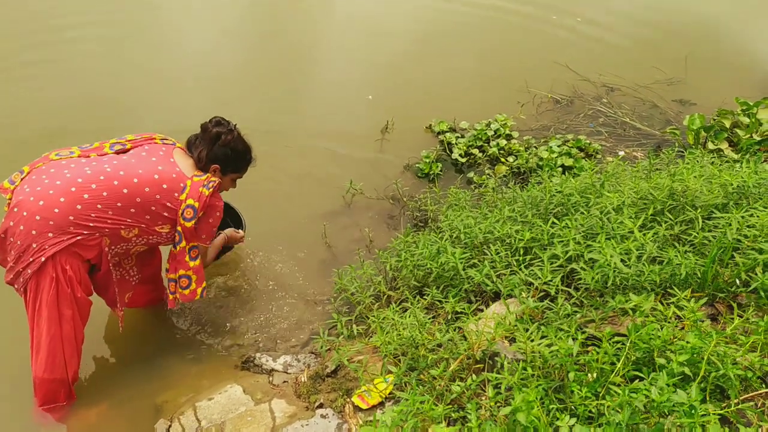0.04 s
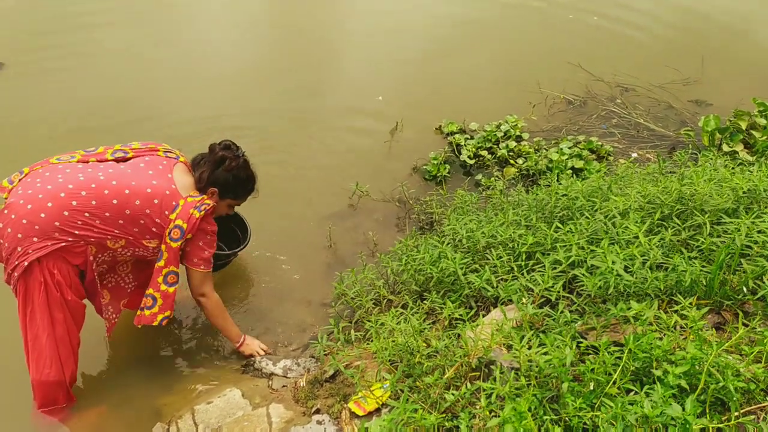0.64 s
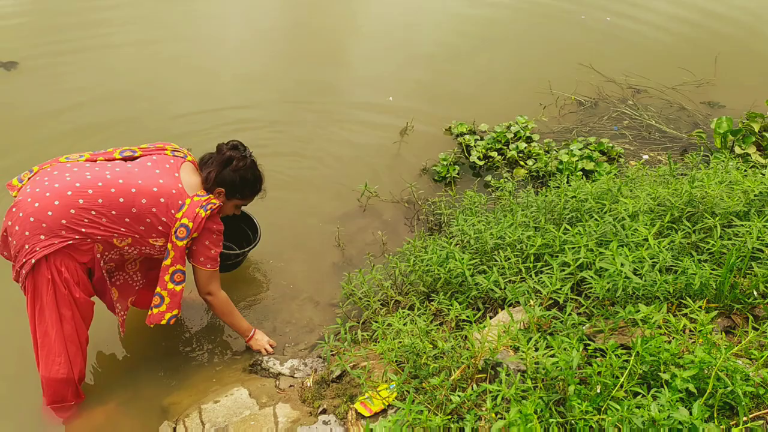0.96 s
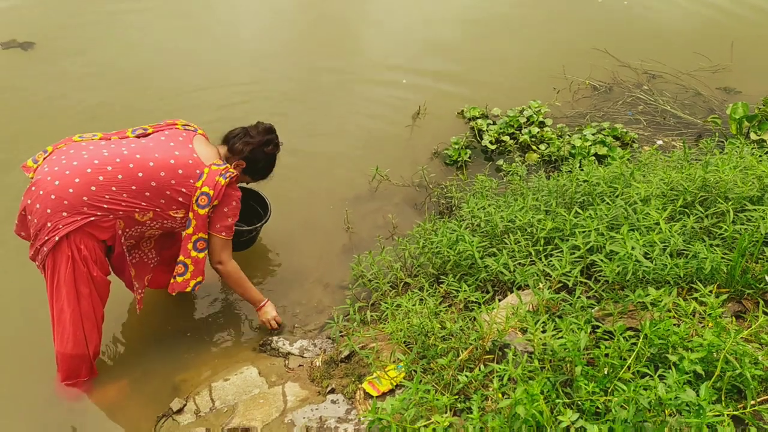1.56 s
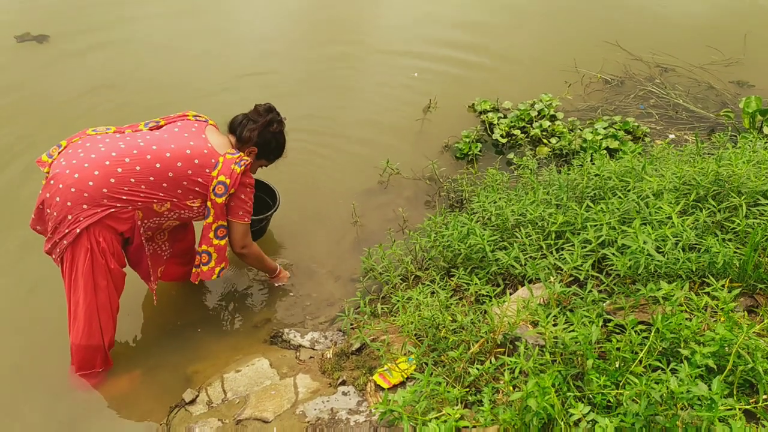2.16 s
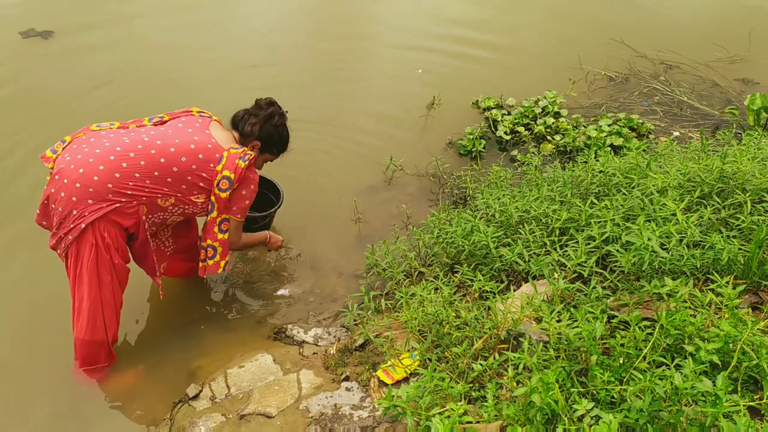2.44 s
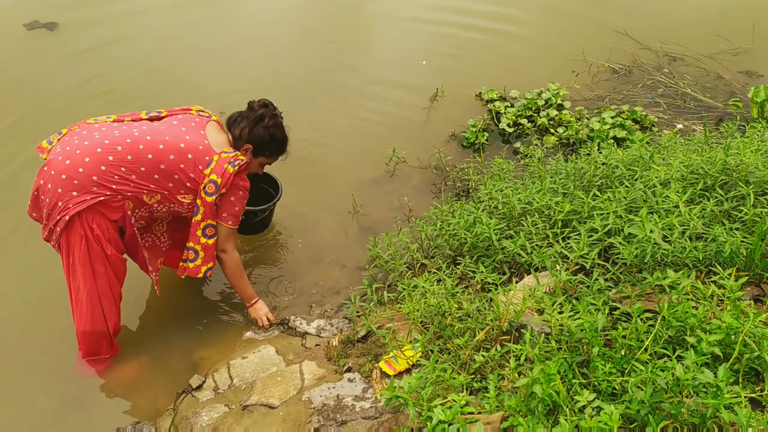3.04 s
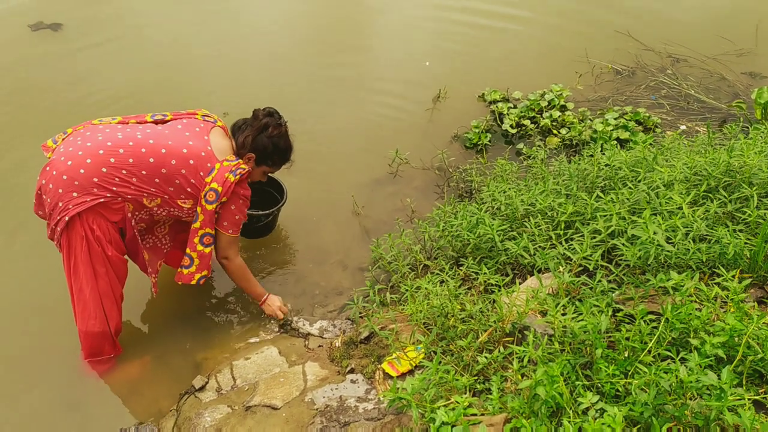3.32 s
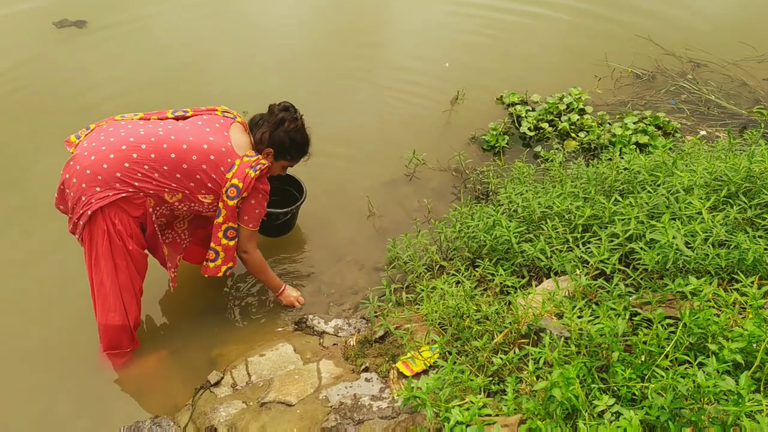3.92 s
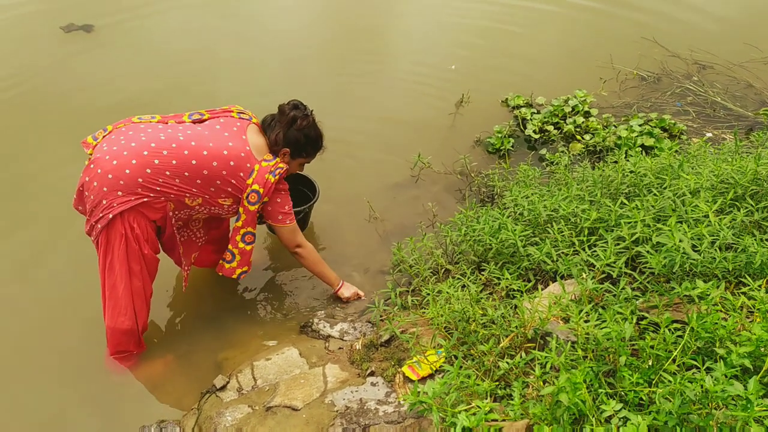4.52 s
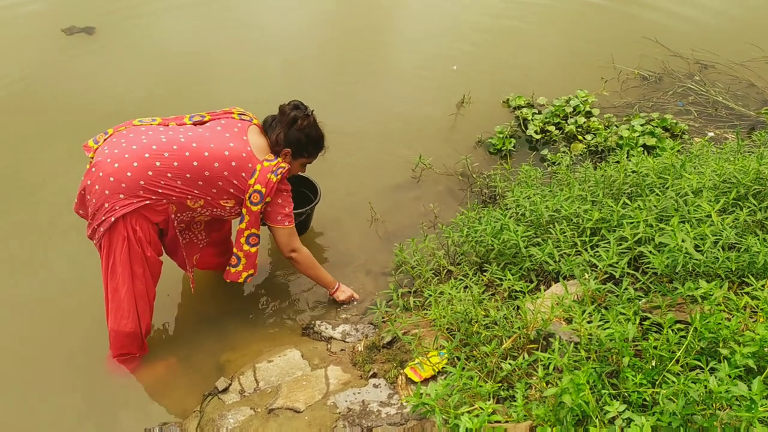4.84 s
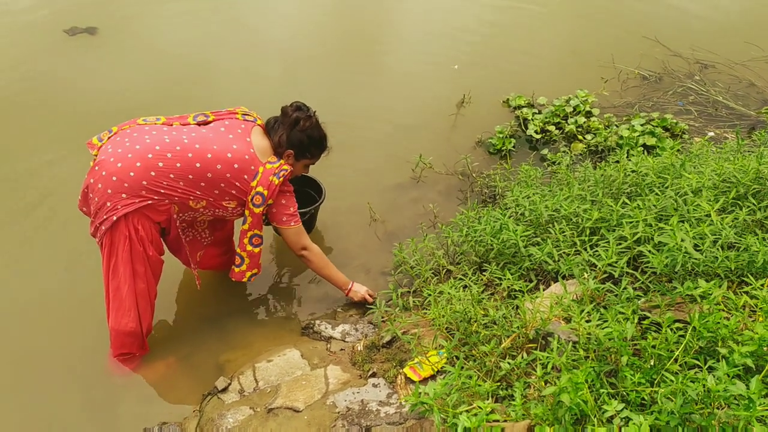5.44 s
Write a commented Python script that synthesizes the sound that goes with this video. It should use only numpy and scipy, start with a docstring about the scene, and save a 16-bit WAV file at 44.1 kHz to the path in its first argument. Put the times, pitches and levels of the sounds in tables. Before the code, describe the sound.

At a river's edge, wind buffets the microphone while a hand swishes through shallow water. Small hard objects clatter into a plastic bucket, bouncing and rolling briefly. A few drips and a soft trickle follow, then a second clatter in the bucket. The water and bucket are close and dry; behind them are a soft open-air hiss, a faint distant engine, an insect's trill and a chirping bird.

```python
"""Two clattering drops into a plastic bucket, amid swishes and drips at a river's edge.
Small hard finds strike the bucket's floor and wall, bounce, roll and ring its air. A wader's hand
stirs the shallows into bubbles and spray; water drips and trickles off it. Wind buffets the
microphone, mostly at first. Behind: open-air hiss, a slow far engine, an insect's trill, a bird."""
import sys
import numpy as np
from scipy import signal
from scipy.fft import rfft, irfft
from scipy.io import wavfile

SR = 44100
rng = np.random.default_rng(int(sys.argv[2]) if len(sys.argv) > 2 else 0)


def master(y):
    """Save y as 16-bit WAV."""
    cut = np.clip(np.atleast_2d(y).T, -1, 1)
    pcm = np.round(cut * 32767)  # scale
    wavfile.write(sys.argv[1], SR, pcm.astype(np.int16))


N = 246078

# Likeness of the two microphone ports, general and near: (frequency [Hz], coherence [clipped to 0-1])
COHERENCE = [(60, 0.89), (250, 1), (600, 0.48), (1500, 0.044), (3000, 0.008), (12000, 0.014)]
NEAR_COHERENCE = [(1900, 0.5), (3600, -1), (8000, 0.03)]
# Bucket wall modes: (frequency [Hz], relative level [dB], t60 [s])
WALL_MODES = [(720, -27, 0.019), (847, -9, 0.04), (1237, -6.5, 0.023), (1584, -6.5, 0.04),
              (1686, -5.5, 0.013), (1775, -6, 0.02), (1965, -2.5, 0.021), (2156, -9.5, 0.046),
              (2498, -7, 0.024), (3004, -12.5, 0.04), (3596, 0.5, 0.024), (4010, -11, 0.023),
              (4930, -5, 0.011)]


def gain_of(db):
    """Decibels to amplitude."""
    return 10 ** (np.asarray(db) / 20)


def unit_rms(x):
    """Scale to rms 1."""
    return x / np.sqrt(np.mean(x ** 2) + 1e-20)


def unit_peak(x):
    """Scale so the channel mean peaks at 1."""
    return x / abs(x.mean(0)).max()


def unit_onset(x, size=256):
    """Scale to rms 1 over the first samples."""
    return x / np.sqrt(np.mean(x[:, :size] ** 2))


def log_interp(points, hz):
    """Interpolate on a log-frequency axis."""
    point_hz, value = np.transpose(points)
    return np.interp(np.log(hz + 1), np.log(point_hz + 1), value)


def add(mix, start_s, sound):
    """Mix a sound in at start_s."""
    part = mix[:, max(round(start_s * SR), 0):][:, :sound.shape[-1]]
    part += sound[..., :part.shape[1]]


def colour(x, points, size=4096):
    """Minimum-phase filter through points (frequency [Hz], gain [dB])."""
    hz = abs(np.fft.fftfreq(size, 1 / SR))
    log_gain = np.log(gain_of(np.maximum(log_interp(points, hz), -100)))
    taps = np.fft.ifft(np.exp(np.conj(signal.hilbert(log_gain)))).real[:size // 2]
    return signal.oaconvolve(x, taps[None], axes=1)[:, :x.shape[1]]


def convolve(x, response):
    """Convolve along time, cut to N samples."""
    return signal.fftconvolve(np.atleast_2d(x), np.atleast_2d(response), axes=1)[:, :N]


def wander(rate_hz, size=N):
    """Smooth random drift, rms 1."""
    hz = np.fft.rfftfreq(size, 1 / SR)
    return unit_rms(irfft(rfft(rng.standard_normal(size)) / (1 + (hz / rate_hz) ** 4), size))


def stereo_noise(size=N, coherence=COHERENCE):
    """White noise, partly alike at two close ports."""
    alike = np.clip(log_interp(coherence, np.fft.rfftfreq(size, 1 / SR)), 0, 1)
    left, other = rfft(rng.standard_normal((2, size)))
    right = alike * left + np.sqrt(1 - alike ** 2) * other
    return irfft(np.array([left, right]), size)


def noise_band(phase, spread_hz):
    """Narrow noise around a carrier, independent per port."""
    size = len(phase)
    return np.array([wander(spread_hz, size) * np.cos(phase) + wander(spread_hz, size) * np.sin(phase)
                     for port in range(2)])


def burst(t, t60_s, coherence=COHERENCE):
    """Decaying stereo noise puff."""
    return stereo_noise(len(t), coherence) * gain_of(-60 * t / t60_s)


def swells(rows, rise_s, fall_s):
    """Envelope of (start [s], hold [s], level [dB]) rows; rise_s and fall_s are per 20 dB."""
    t = np.arange(N) / SR
    gains = []
    for start_s, hold_s, db in rows:
        before = np.maximum(start_s - t, 0) / rise_s
        after = np.maximum(t - start_s - hold_s, 0) / fall_s
        gains.append(gain_of(db - 20 * (before + after)))
    return np.linalg.norm(gains, axis=0)


def air():
    """Soft, restless hiss of grass and open water."""
    # Hiss before the tilt: (frequency [Hz], gain [dB])
    spectrum = [(24, -31), (40, -18), (105, 0), (246, -8.5), (546, -14.5), (631, -21), (844, -19.5),
                (1400, -27.5), (1580, -25.5), (2020, -33.5), (3880, -27), (5060, -31.5), (8210, -34.5),
                (10200, -38.5), (13000, -35), (13500, -70)]
    hiss = colour(stereo_noise(), spectrum)
    treble = signal.sosfilt(signal.butter(4, 1000, "high", fs=SR, output="sos"), hiss)
    tilted = colour(hiss, [(100, -3), (400, -6), (900, -5), (3000, 1.5)])
    return gain_of(-57.5) * tilted / treble.std() * gain_of(2 * wander(12))


def engine(firing_hz=25.55, right_lag_s=0.00014):
    """One far cylinder to the left: a thud and an exhaust puff per firing."""
    # One thud: (frequency [Hz], gain [dB])
    spectrum = [(30, -70.5), (55, -31), (80, 0), (128, 3), (195, -0.5), (250, 4.5), (330, -6.5), (430, -9),
                (560, -27), (850, -19.5), (1500, -49), (3000, -52)]
    cycles = (np.arange(N) / SR + 0.008) * firing_hz
    pulses = np.diff(np.floor(cycles), prepend=0) * gain_of(1.3 * wander(2.6))
    puffs = stereo_noise() * np.exp(-(cycles % 1) / 0.28)
    thuds = colour(unit_rms(pulses) + 0.35 * unit_rms(puffs), spectrum)
    left, right = gain_of(-50.5) * unit_rms(thuds)
    return np.array([left, np.roll(right, round(right_lag_s * SR))])


def insect(pitch_hz=4000):
    """Narrow fluttering trill over the wider band of a distant chorus."""
    # Trill bouts: (start [s], hold [s], level [dB])
    bouts = [(1.66, 0.38, -55), (2.44, 0.6, -54.5)]
    carrier = 2 * np.pi * pitch_hz * np.arange(N) / SR
    trill = noise_band(carrier, spread_hz=76)
    chorus = noise_band(carrier, spread_hz=360)
    buzz = unit_rms(trill * gain_of(2 * wander(110))) + gain_of(-9.5) * chorus
    return unit_rms(buzz) * swells(bouts, rise_s=0.21, fall_s=0.18)


def bird():
    """Gliding, faltering whistles; rough notes spread into a rasp."""
    # Notes: (start [s], length [s], first pitch [Hz], last pitch [Hz], level [dB], roughness [0-1])
    notes = [(2.319, 0.057, 4000, 3550, -55, 0.13), (2.524, 0.044, 4050, 3510, -53, 0.18),
             (3.038, 0.26, 3700, 3370, -58.5, 0.7), (3.1, .18, 3000, 2840, -64, 0.48),
             (3.895, 0.054, 5520, 5250, -49, 0.27), (4.0, 0.068, 3546, 3383, -49.5, 0.3),
             (4.218, 0.048, 5020, 5690, -53, 0), (4.247, 0.025, 5760, 5666, -47, 0),
             (4.262, 0.04, 5700, 4500, -53.5, 0.34), (4.286, 0.058, 3700, 3770, -56, 0.35),
             (4.331, 0.094, 4470, 3100, -49, 0.36), (4.394, 0.059, 2330, 1960, -57.5, 0.3),
             (4.496, 0.08, 2100, 1500, -60, 0.25), (4.566, 0.042, 2970, 3640, -59, 0.14),
             (4.602, 0.055, 4500, 3500, -55.5, 0.5), (4.711, 0.054, 5720, 6250, -52.5, 0.48),
             (4.783, 0.038, 4770, 4200, -52, 0.3), (4.821, 0.067, 3520, 3416, -42.5, 0.28),
             (4.902, 0.094, 3900, 3810, -59, 0.38), (4.993, 0.11, 7850, 6860, -62, 0.24),
             (5.421, 0.024, 3470, 3700, -47, 0.94)]
    out = np.zeros((2, N))
    for start_s, length_s, first_hz, last_hz, db, rough in notes:
        size = round(length_s * SR)
        rough = np.clip(rough, 0.05, 1)
        progress = np.linspace(0, 1, size)
        pitch_hz = last_hz + (first_hz - last_hz) * (1 - progress) ** 1.9  # fast, then settling
        phase = 2 * np.pi * np.cumsum(pitch_hz) / SR
        rasp = noise_band(phase, spread_hz=900 * rough)
        whistle = np.sin(phase + np.pi * rng.random((2, 1)))
        envelope = np.sin(np.pi * progress) * gain_of(4 * wander(60, size))
        note = ((1 - rough) ** 2 * whistle + rough * rasp) * envelope
        add(out, start_s, gain_of(db) * unit_rms(note))
    return out


def leaf_scatter(x):
    """Leaves smear a sound into a short blur."""
    tail = burst(np.arange(SR // 2) / SR, t60_s=0.12)
    return convolve(x, tail / np.linalg.norm(tail[0]))


def bank_scatter(x):
    """Diffuse tail from the river bank and its plants."""
    t = np.arange(SR) / SR
    echoes = burst(t, t60_s=0.9) * (1 - np.exp(-t / 0.0025))
    tail = colour(echoes, [(200, -2), (1000, -2), (4000, 3), (12000, 2)])
    return convolve(x, tail / np.linalg.norm(tail[0]))


def wind(full_spectrum_db=-34):
    """Turbulence at each port, duller in weak gusts, with low buffets on top."""
    # Gusts: (start [s], hold [s], level [dB])
    gusts = [(0, 0.32, -28), (.41, 0.016, -24.5), (.57, 0.25, -29.5), (.95, 0.25, -30.5),
             (1.42, 1.13, -49.5), (1.7, 0.036, -44), (2.66, 0.17, -44), (3.08, 0.015, -43.5)]
    # Full gust: (frequency [Hz], gain [dB])
    spectrum = [(25, -59), (67, 0.5), (156, -1), (209, -6), (303, -11), (380, -19), (868, -41), (1560, -57),
                (2640, -120)]
    # Buffets: (time [s], level [dB], spectral peak [Hz])
    buffets = [(.077, -35.5, 380), (.133, -29.5, 365), (.417, -26.5, 335), (0.627, -24.5, 293),
               (.772, -21, 510), (.778, -20.5, 314), (.839, -24.5, 246), (1.095, -28, 364),
               (1.118, -26, 327)]
    # Wind balance at the ports: (time [s], left over right [dB])
    balance = [(.2, -12), (.7, 9), (2.6, 12), (3.6, 11)]
    eddies = np.array([rng.standard_normal(N) * gain_of(4.05 * wander(23.6)) for port in range(2)])
    full = unit_rms(colour(eddies, spectrum))
    dull = unit_rms(colour(full, [(130, -14.5), (260, -30), (600, -31)]))
    strength = swells(gusts, rise_s=0.096, fall_s=0.22)
    brightness = np.minimum(strength / gain_of(full_spectrum_db), 1) ** 2
    out = strength * (brightness * full + (1 - brightness) * dull)
    t = np.arange(SR // 8) / SR
    for time_s, db, hz in buffets:
        shape = [(50, -16.5), (hz / 2, -2), (hz, 4.5), (2 * hz, -10), (2.84 * hz, -27.5), (10 * hz, -55)]
        add(out, time_s, gain_of(db) * unit_peak(colour(burst(t, t60_s=0.032), shape)))
    balance_db = np.interp(np.arange(N) / SR, *np.transpose(balance))
    return out * gain_of([balance_db / 2, -balance_db / 2])


def bubble(t, hz, t60_s, glide):
    """An air pocket rings, its pitch rising as it nears the surface."""
    phase = 2 * np.pi * hz * t * (1 + glide * t / t60_s)
    return np.sin(phase) * gain_of(-60 * t / t60_s) * (1 - np.exp(-t * hz))


def fizz(sizes=16, crackles_per_s=420):
    """Clouds of small bubbles, each size surging on its own, plus fine drops and wet crackles."""
    t = np.arange(SR // 24) / SR
    clouds, crackles = np.zeros((2, 2, N))
    for hz in np.geomspace(600, 12000, sizes):
        strength = gain_of(3.3 * np.minimum(rng.exponential(1, N), 3.5))
        births = rng.random(N) < (400 + hz / 10) / SR
        surge = gain_of(2.5 * wander(20))
        port_gains = 1 + 0.5 * rng.standard_normal((2, N))
        grain = np.sqrt(hz) * bubble(t, hz, 14 / hz, glide=0.16)
        clouds += convolve(births * strength * surge * port_gains, grain)
    for hz in np.geomspace(1200, 11000, sizes):
        pops = rng.random(N) < crackles_per_s / sizes / SR
        port_gains = 1 + 0.4 * rng.standard_normal((2, N))
        crackles += convolve(pops * port_gains, np.sqrt(hz) * bubble(t, hz, 18 / hz, glide=0.1))
    drops = stereo_noise()
    mix = unit_rms(clouds) + 0.6 * unit_rms(drops) + 0.55 * unit_rms(crackles)
    return mix * gain_of(1.2 * wander(90))


def spray_filter(x):
    """Bright band of fine spray."""
    # Spray: (frequency [Hz], gain [dB])
    spectrum = [(2500, -38), (4200, 7), (7000, 6.5), (9500, 5), (13000, 7), (13600, -43.5)]
    return colour(x, spectrum)


def drips():
    """Drops slap the water: a short body and a snap of spray."""
    # Drops: (time [s], body level [dB], relative spray level [dB])
    drops = [(.755, -60, -39), (.792, -60, -39), (0.966, -60, -32), (1.033, -72, -37.5), (1.626, -34, -47),
             (1.939, -36.5, -42), (2.161, -37, -44), (2.268, -38, -45.5), (3.286, -46, -40),
             (5.267, -52, -38.5), (5.309, -43, -33), (5.363, -49.5, -35)]
    # Slap body: (frequency [Hz], gain [dB])
    body_spectrum = [(200, 14), (600, 6.5), (1200, 7), (2500, -6), (4200, 2.5), (7000, -27)]
    t, out = np.arange(SR // 12) / SR, np.zeros((2, N))
    for time_s, body_db, spray_db in drops:
        body = gain_of(body_db) * unit_peak(colour(burst(t, t60_s=0.015), body_spectrum))
        snap = burst(t, t60_s=0.005) + 0.3 * burst(t, t60_s=0.03)
        add(out, time_s, body + gain_of(spray_db - 1) * unit_peak(spray_filter(snap)))
    return out


def swishes():
    """The hand sloshes, throws spray and traps air; water then trickles off it."""
    # Hand strokes: (start [s], hold [s], slosh level [dB], spray level [dB])
    strokes = [(0.616, 0.032, -43, -42.5), (0.717, 0.039, -44, -46), (0.823, 0.027, -41, -50),
               (0.895, 0.048, -47, -55), (0.96, 0.031, -59.5, -50)]
    # Run-off: (start [s], hold [s], level [dB])
    trickles = [(1.43, 0.2, -57.5), (3.35, 0.26, -63), (5.22, 0.19, -64.5)]
    # Trapped bubbles: (time [s], pitch [Hz], relative level [dB], t60 [s])
    gulps = [(.714, 1370, -30.5, 0.028), (0.846, 3230, -29, 0.023), (1.032, 3970, -38.5, 0.019),
             (3.193, 7740, -45, .03)]
    # Slosh: (frequency [Hz], gain [dB])
    slosh_spectrum = [(300, -10), (600, -8), (950, -7), (1350, 2), (2100, -6), (2700, -3.5), (3800, 5),
                      (4400, -2), (5300, -17)]
    t, bubbles = np.arange(SR // 12) / SR, fizz()
    sloshing = swells(np.array(strokes)[:, [0, 1, 2]], rise_s=0.068, fall_s=0.063)
    spraying = swells(np.array(strokes)[:, [0, 1, 3]], rise_s=0.068, fall_s=0.063)
    trickling = swells(trickles, rise_s=0.27, fall_s=0.089)
    slosh = unit_rms(colour(bubbles, slosh_spectrum)) * (sloshing + gain_of(-4.5) * trickling)
    spray = unit_rms(spray_filter(bubbles)) * (spraying + trickling)
    out = slosh + spray
    for time_s, hz, db, t60_s in gulps:
        add(out, time_s, gain_of(db + 2.5) * bubble(t, hz, t60_s, glide=0.059))
    return out


def spurts(count=70):
    """Fingers break the surface: clusters of like-sized bubbles thicken, then thin out."""
    # Bubble clusters: (centre [s], half-length [s], pitch [Hz], level [dB])
    clusters = [(0.603, 0.029, 1300, -53), (0.643, 0.064, 10600, -58), (0.735, 0.042, 1960, -51),
                (0.821, 0.011, 6850, -49), (0.846, 0.015, 2280, -44.5), (0.915, 0.014, 2700, -48),
                (0.934, 0.018, 1320, -47), (3.43, .045, 5120, -50.5), (3.454, .06, 3400, -56),
                (3.649, 0.0078, 4240, -51), (3.664, 0.0044, 6650, -47)]
    t, out = np.arange(SR // 24) / SR, np.zeros((2, N))
    for centre_s, half_s, hz, db in clusters:
        cluster = np.zeros((2, SR // 3))
        onsets_s = half_s * rng.random((count, 2)).sum(1)  # triangular density
        for onset_s, (detune, force, side) in zip(onsets_s, rng.standard_normal((count, 3))):
            pitch_hz = hz * np.exp(0.12 * detune)
            port_gains = gain_of(2 * force + 2 * side * np.array([[1], [-1]]))
            add(cluster, onset_s, port_gains * bubble(t, pitch_hz, 20 / pitch_hz, glide=0.079))
        energy = (cluster ** 2).mean(0).sum()
        add(out, centre_s - half_s, gain_of(db) * cluster * np.sqrt(half_s * SR / energy))
    return out


def ring(modes, t, cutoff_hz, spread_db, jitter_s, rise_s):
    """Modes struck at a random spot; soft contact spares the high ones, which differ in phase per port."""
    hz, db, t60_s = np.transpose(modes)[:, :, None]
    weight, detune, shift, skew = rng.standard_normal((4, len(modes), 1))
    phase = 2 * np.pi * hz * ((1 + 0.021 * detune) * t + jitter_s * shift)
    decay = gain_of(db + spread_db * weight - 60 * t / t60_s) / (1 + (hz / cutoff_hz) ** 4)
    port_phase = skew * np.minimum((hz / 4200) ** 4, 1)
    ports = np.array([(decay * np.sin(phase + side * port_phase)).sum(0) for side in (-1, 1)])
    return unit_onset(ports * (1 - np.exp(-t / rise_s)))


def rolling(t, taps_per_s=170):
    """Rough finds tumble on plastic: tiny taps at each of three wall spots."""
    # Rolls between knocks: (start [s], hold [s], level [dB])
    rolls = [(1.285, 0.045, -41), (1.405, 0.025, -44.5), (3.735, 0.014, -47.5), (3.842, 0.03, -39),
             (3.94, 0.031, -47.5)]
    spots = rng.standard_normal((3, N)) * (rng.random((3, N)) < taps_per_s / SR)
    out = np.zeros((2, N))
    for taps in spots:
        wall = ring(WALL_MODES, t, cutoff_hz=3380, spread_db=4, jitter_s=0.00019, rise_s=0.00072)
        out += convolve(taps, wall)
    return unit_rms(out) * swells(rolls, rise_s=0.014, fall_s=0.038)


def cavity(x):
    """Add the bucket's inner reflections and ringing air."""
    # Reflections: (frequency [Hz], gain [dB])
    spectrum = [(150, -51), (350, 6), (510, 2.5), (950, 4.5), (1900, -16), (2900, 6), (3600, -3),
                (5000, 3.5), (9000, -14), (13000, -16)]
    # Air modes: (frequency [Hz], relative level [dB], t60 [s])
    air_modes = [(423, 0, 0.08), (520.4, -9.5, 0.21), (676, -14, 0.15), (1560, -2, 0.097), (1770, 8, 0.03),
                 (2140, -8, 0.117), (2540, -27, 0.078), (2620, -9, .16), (3130, 0, .12)]
    t = np.arange(SR // 2) / SR
    early = burst(t, t60_s=0.047, coherence=NEAR_COHERENCE)
    late = gain_of(-17.5) * burst(t, t60_s=0.42)
    echoes = colour((early + late) * (1 - np.exp(-t / 0.0011)), spectrum)
    ringing = sum(gain_of(db - 60 * t / t60_s) * np.sin(2 * np.pi * (hz * t + rng.random()))
                  for hz, db, t60_s in air_modes)
    echoes *= gain_of(-18.5) / np.linalg.norm(echoes[0])
    ringing *= gain_of(-26) / np.linalg.norm(ringing)
    return x + convolve(x, echoes + ringing)


def bucket(spot_db_per_octave=9, half_ring_db=-10.5):
    """Each knock thumps the floor, clacks the wall and cracks at the contact; the finds roll between."""
    # Knocks, relative levels: (time [s], floor [dB], wall [dB], crack [dB], struck spot's pitch [Hz])
    knocks = [(1.2747, -45, -18, -39, 2880), (1.2783, -26, -7.5, -28, 1920), (1.2823, -21, -10.5, -6, 3550),
              (1.2838, -14, -29, -16, 3500), (1.2884, -15.5, -16.5, -23, 2620),
              (1.2964, -25, -31, -28, 2000), (1.306, -13, -29, -27, 1500), (1.3167, -22, -23, -24.5, 1990),
              (1.3556, -18, -46, -57, 2100), (1.37, -47, -26.5, -58, 2150), (1.3906, -16.5, -22, -50, 1810),
              (1.407, -32, -26, -30, 2130), (1.4175, -31, -23, -40, 1670), (1.426, -50, -45, -28.5, 2150),
              (1.4348, -26, -29.5, -61, 1350), (1.461, -34, -36.5, -58, 1600),
              (3.7304, -27, -18, -19.5, 3380), (3.7349, -29, -14.5, -23, 2080),
              (3.7396, -37, -22, -25, 2100), (3.747, -38, -13.5, -17, 2100),
              (3.7899, -34, -14.5, -19.5, 2180), (3.8163, -41, -11.5, -13, 2020),
              (3.8194, -33, -15.5, -18, 1800), (3.8324, -47, -25, -25, 2600), (3.8348, -31, -12, -13, 1820),
              (3.8364, -34, -15, -19.5, 1830), (3.851, -33, -26, -43, 1900), (3.860, -34, -27, -31, 2100),
              (3.8787, -38, -26, -43, 1900), (3.889, -32.5, -29, -50, 2100), (3.918, -61, -53, -26, 3500),
              (3.9303, -40, -21.5, -44, 2080), (3.933, -35.5, -19, -27.5, 3650),
              (3.964, -37.5, -24, -32, 1950), (4.013, -47, -36.5, -54, 2100),
              (4.087, -46.5, -37.5, -75, 1700)]
    # Floor modes: (frequency [Hz], relative level [dB], t60 [s])
    floor_modes = [(287, -9, 0.017), (431, -5, 0.02), (508, 1, 0.027), (690, -6.5, 0.015)]
    # Contact crack: (frequency [Hz], gain [dB])
    crack_spectrum = [(200, -11.5), (1000, -5.5), (3800, 3.5), (6100, -5), (7400, -1.5), (8300, -5.5),
                      (9200, -1.5), (11000, -8), (14000, -15)]
    t, out = np.arange(SR // 6) / SR, np.zeros((2, N))
    for time_s, floor_db, wall_db, crack_db, spot_hz in knocks:
        contact_hz = 7500 * gain_of(0.33 * (crack_db - wall_db))  # little crack: soft blow
        damping = 1 + gain_of(wall_db - half_ring_db) ** 2  # hard blows press into the wall
        spot_modes = [(hz, db - spot_db_per_octave * abs(np.log2(hz / spot_hz)), t60_s / damping)
                      for hz, db, t60_s in WALL_MODES]
        thump = ring(floor_modes, t, cutoff_hz=1500, spread_db=4, jitter_s=0.00005, rise_s=0.006)
        clack = ring(spot_modes, t, cutoff_hz=contact_hz, spread_db=2, jitter_s=0.00012, rise_s=0.00042)
        snap = burst(t, t60_s=0.01, coherence=NEAR_COHERENCE)
        snap += gain_of(-5.5) * burst(t, t60_s=0.025, coherence=NEAR_COHERENCE)
        crack = unit_onset(colour(snap, crack_spectrum))
        add(out, time_s, gain_of(floor_db - 7) * thump)
        add(out, time_s, gain_of(wall_db - 11) * clack)
        add(out, time_s, gain_of(crack_db - 12) * crack)
    return cavity(out + rolling(t))


def port_shadow(x):
    """The microphone body shades one port or the other, by frequency."""
    # Near-sound balance: (frequency [Hz], left over right [dB])
    balance = [(2200, 0.5), (3700, -3.5), (7500, 8.5), (13000, -1)]
    balance_db = log_interp(balance, np.fft.rfftfreq(N, 1 / SR))
    return irfft(rfft(x) * gain_of([balance_db / 2, -balance_db / 2]), N)


def scene():
    """Bucket and water near and almost dry; bird among the plants; background behind."""
    near = port_shadow(bucket() + drips() + swishes() + spurts())
    song = bird()
    far = song + gain_of(-1.5) * leaf_scatter(song) + gain_of(-15.5) * bank_scatter(song)
    return near + gain_of(-20) * bank_scatter(near) + far + insect() + engine() + wind() + air()


def record(dry):
    """Low-pass: removes the highest treble, above about 14 kHz."""
    cutoff_hz = 13900
    lowpass = signal.firwin(255, cutoff_hz, window=("kaiser", 8), fs=SR)
    return signal.oaconvolve(dry, lowpass[None], "same")


dry = scene()
out = record(dry)
master(out)
```